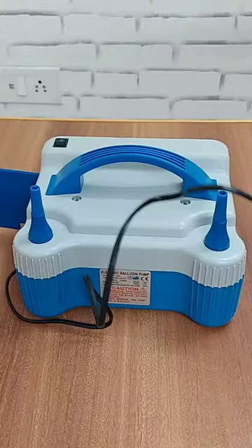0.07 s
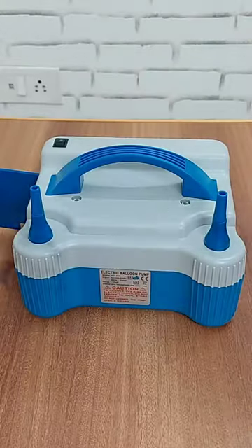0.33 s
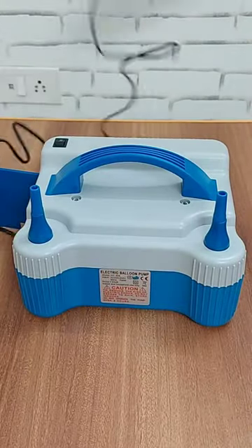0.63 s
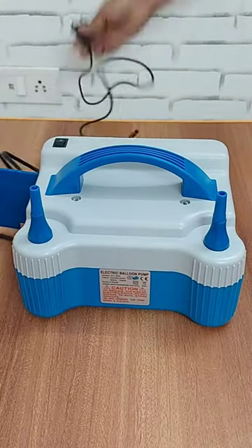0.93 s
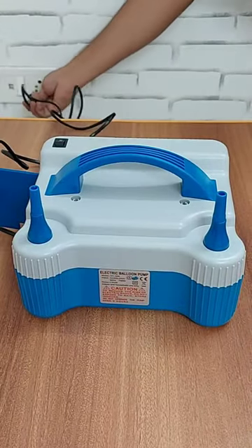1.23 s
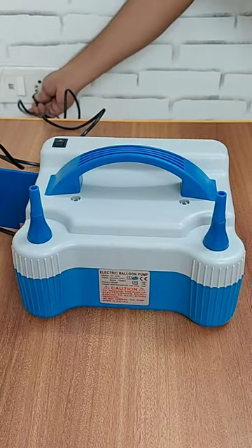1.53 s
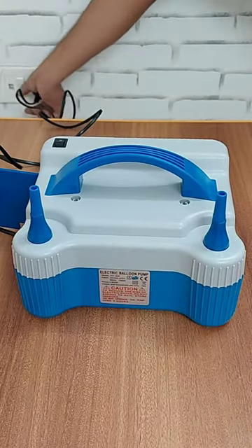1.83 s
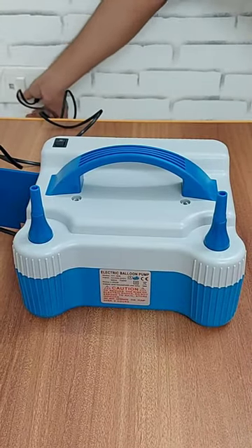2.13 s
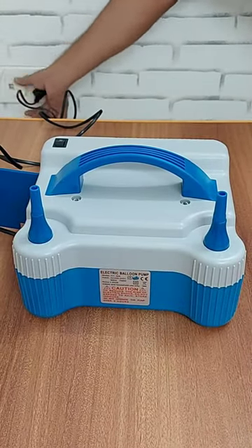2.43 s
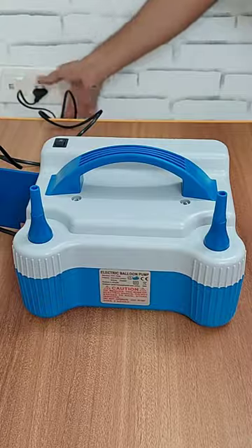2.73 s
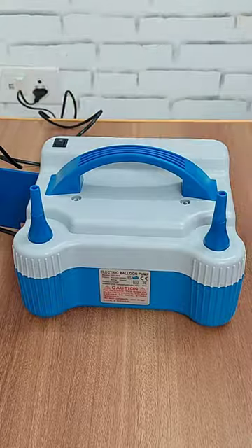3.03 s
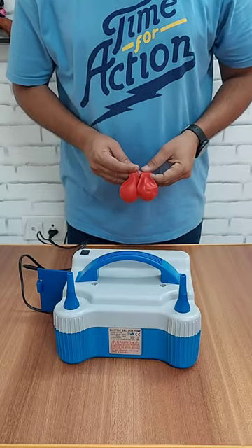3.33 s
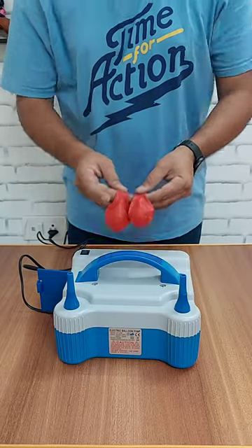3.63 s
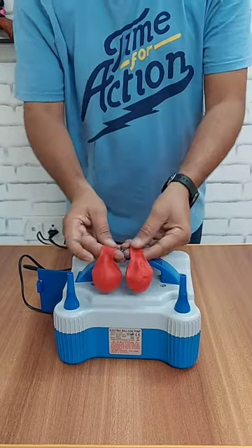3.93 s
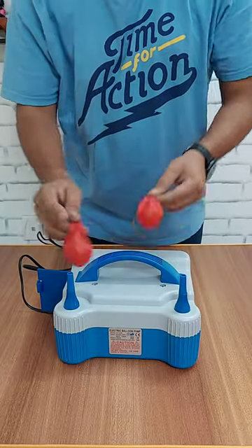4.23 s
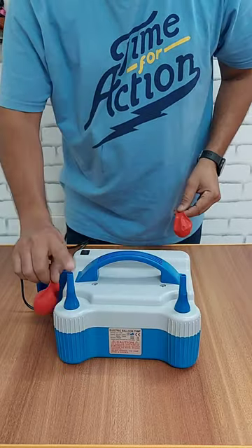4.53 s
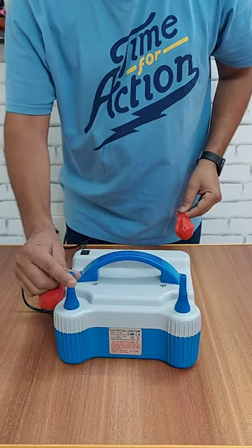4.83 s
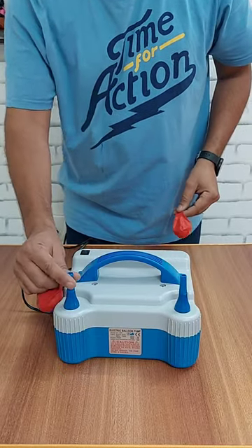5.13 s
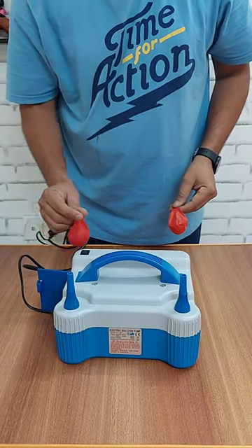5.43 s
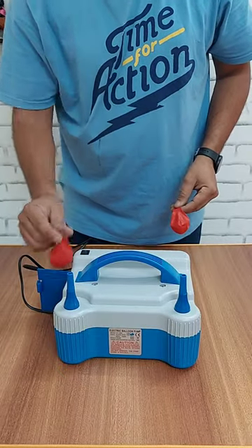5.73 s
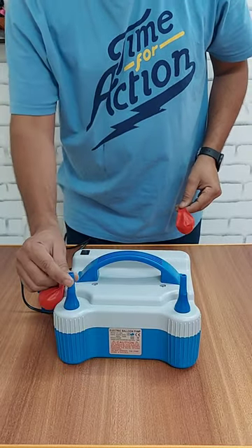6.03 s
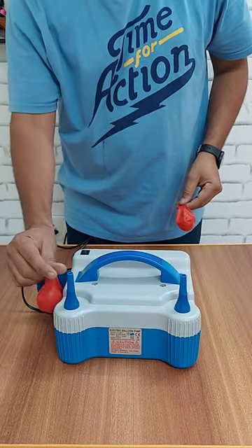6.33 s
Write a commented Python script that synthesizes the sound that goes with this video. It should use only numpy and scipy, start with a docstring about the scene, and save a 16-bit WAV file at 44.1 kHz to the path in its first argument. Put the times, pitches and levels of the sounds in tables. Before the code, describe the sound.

In a small, echoing room, a power cord slides and clatters on a wooden table over a low rumble. A plug and switch give a few plastic clacks, then sleeves and rubber rustle softly. An electric balloon pump kicks in twice, briefly and loudly, each time with a buzz, a rising whine and a roar of air that sinks as the fan coasts. The sound is in stereo and fairly near.

```python
"""A low rumble and the rustle of a cord come first, in a small, bright room. The cord of an electric
balloon pump is tossed over a wooden table, plugged in and switched on with clacks and thuds; rubber
and shirt sleeves rustle. The nozzle is pressed twice. Each time the motor jumps up with a mains buzz,
its seven-blade fan roars and whines, and then the drag of the air slows it down."""
import sys
import numpy as np
from scipy import signal
from scipy.fft import rfft, irfft, next_fast_len
from scipy.io import wavfile
from scipy.ndimage import uniform_filter1d

SR = 44100
rng = np.random.default_rng(int(sys.argv[2]) if len(sys.argv) > 2 else 0)


def unload_wav(signal):
    """Save mono or channel-first audio to the path in sys.argv[1] as 16-bit WAV at rate SR, clipped to [-1, 1]."""
    wavfile.write(
        sys.argv[1],
        SR,
        np.round(np.clip(np.atleast_2d(signal).T, -1, 1) * 32767).astype(np.int16),
    )


N = 289737
TIME = np.arange(N) / SR
FREE_TURNS_PER_S = 545  # the speed that the powered motor heads for


def undb(db):
    """Turn decibels into a number to multiply by."""
    return 10 ** (np.asarray(db) / 20)


def unit(x):
    """Scale a signal to an average (rms) level of 1."""
    return x / np.sqrt(np.mean(x ** 2))


def at_hz(points, hz):
    """Read between (pitch_hz, value) points, with every octave equally wide."""
    pitches, values = np.transpose(points)
    return np.interp(np.log(hz + 1), np.log(pitches), values)


def band(x, low_hz, high_hz, order=2):
    """Keep the sound between two pitches."""
    return signal.sosfilt(signal.butter(order, [low_hz, high_hz], "band", fs=SR, output="sos"), x)


def ring(x, modes):
    """Let a sound ring at an object's own pitches, its modes: pitch_hz, width_hz, level_db."""
    return sum(undb(db) * signal.lfilter(*signal.iirpeak(hz, hz / width, fs=SR), x)
               for hz, width, db in modes)


def wander(per_s):
    """A random drift of about 1 up or down."""
    points = rng.standard_normal(int(N / SR * per_s) + 2)
    return np.interp(TIME * per_s, np.arange(len(points)), points)


def bump(peak_s, half_s):
    """A smooth rise from 0 to 1 and back."""
    return np.exp(-((TIME - peak_s) / half_s) ** 2)


def lagged(x, lag_s):
    """Follow a changing value smoothly and a little late."""
    keep = np.exp(-1 / (lag_s * SR))
    return signal.lfilter([1 - keep], [1, -keep], x)


def diffuse(size, colour=None):
    """Noise from all sides: alike at both ears in the bass, unrelated in the treble."""
    # how alike the ears hear it: pitch_hz, likeness (1 = the same)
    likeness = [(60, .92), (130, 0.92), (290, 0.92), (640, 0.45), (1400, 0.018), (3000, -0.031),
                (7000, -0.062)]
    hz = np.arange(size // 2 + 1) * SR / size
    alike = at_hz(likeness, hz)
    white = rfft(rng.standard_normal((2, size)))
    mid, side = white[0] * np.sqrt(1 + alike), white[1] * np.sqrt(1 - alike)
    gain = 1 if colour is None else undb(at_hz(colour, hz))
    return unit(irfft(np.array([mid + side, mid - side]) * gain, size))


def noise(colour=None):
    """Noise from all sides, as long as the scene."""
    return diffuse(next_fast_len(N, True), colour)[:, :N]


def room(x, direct_db, build_s):
    """The direct sound, then dense echoes off table and brick that die faster in the treble."""
    # how long echoes take to fade by 60 dB: pitch_hz, fade_s
    echo_fades = [(100, 0.45), (600, 0.67), (2500, 0.4), (7000, 0.075), (15000, 0.16)]
    pitches, fades_s = np.transpose(echo_fades)
    size = SR // 2
    t, hz = np.arange(size) / SR, np.arange(size // 2 + 1) * SR / size
    spectrum, tail = rfft(diffuse(size)), 0
    for share, fade_s in zip(np.eye(len(pitches)), fades_s):
        weight = at_hz(np.c_[pitches, share], hz)
        tail += irfft(spectrum * weight, size) * undb(-60 * t / fade_s)
    tail = unit(tail * (1 - np.exp(-t / build_s))) / np.sqrt(size)
    tail[:, 0] += undb(direct_db)
    return signal.fftconvolve(x[None], tail, axes=1)[:, :N] / np.sqrt(1 + undb(2 * direct_db))


def background(rumble_db=-53, room_db=-51):
    """A restless rumble swells with each movement over soft room noise; both dip briefly once."""
    # the cord is dragged and the arms move: peak_s, half_length_s, level_db
    swells = [(0.036, 0.11, -40.5), (0.314, 0.085, -36.5), (0.61, 0.2, -46), (1.02, 0.066, -43),
              (1.33, .06, -52), (1.727, 0.028, -41.5), (1.915, 0.059, -46.5), (2.15, .08, -44.5),
              (2.33, 0.023, -45), (2.97, 0.19, -48.5), (3.768, 0.077, -53), (4.148, .25, -51.5),
              (4.72, 0.064, -43)]
    # tone of the rumble and of the room noise: pitch_hz, level_db
    rumble_colour = [(20, -8), (38, 0.5), (55, 5), (80, -1.5), (115, -5.5), (150, -5.5), (200, -20.5),
                     (300, -29.5), (600, -63.5)]
    room_colour = [(60, -23), (110, -2.5), (150, -6.5), (220, -7.5), (410, -15.5), (620, -18), (780, -23),
                   (1400, -22.5), (2050, -22), (2800, -33.5), (4100, -38), (6500, -45.5), (9000, -51),
                   (15000, -54)]
    movement = sum(undb(db) * bump(peak_s, half_s) for peak_s, half_s, db in swells)
    rumble = noise(rumble_colour) * (undb(rumble_db) + movement) * undb(3 * wander(14))
    flicker_db = 1.1 * wander(9)
    dip = undb(-12.5 * bump(peak_s=3.215, half_s=0.064))
    return (rumble + noise(room_colour) * undb(room_db + flicker_db)) * dip


def rubs(grain_db=3):
    """Cord and rubber slide in short, grainy strokes, each around its own pitch."""
    # sliding strokes: time_s, half_length_s, level_db, pitch_hz, width_hz
    strokes = [(0.056, 0.046, -58.5, 8750, 9200), (0.113, 0.026, -56.5, 3040, 3010),
               (0.419, 0.013, -39, 2320, 520), (0.456, 0.012, -43, 690, 300),
               (.77, 0.054, -59.5, 7800, 9350), (0.88, 0.053, -59, 1990, 600),
               (1.097, .3, -63.5, 4750, 5000), (1.316, 0.022, -49.5, 4100, 1500),
               (1.342, 0.022, -57, 3250, 600), (1.899, 0.069, -69, 4970, 7040),
               (2.93, .018, -58, 4280, 1100), (2.943, 0.016, -50.5, 3300, 600),
               (2.952, 0.055, -56.5, 4260, 3010), (3.083, 0.069, -65.5, 8950, 8170),
               (3.295, 0.063, -67, 6500, 1105), (3.817, 0.044, -55.5, 3430, 600),
               (4.57, 0.012, -63.5, 4850, 1290), (4.609, 0.035, -51.5, 3660, 1300),
               (4.675, 0.088, -55.5, 1100, 700), (4.983, .037, -61, 6600, 1800)]
    grain = undb(grain_db * wander(140))
    friction = rng.standard_normal(N) * grain
    out = 0
    for time_s, half_s, db, hz, width in strokes:
        mode = [(hz, width, 0)]
        out += unit(ring(ring(friction, mode), mode)) * undb(db) * bump(time_s - 0.005, half_s)
    return room(out, direct_db=-6.5, build_s=0.0023)


def knocks(tick_s=0.003, build_s=0.0058, spot_db=4):
    """Cord, plug, switch and nozzle knock: a short tick, then echoes that thud, ring, clack and snap."""
    # contacts: start_s, level_db, thud_db, body_db, snap_db, tick_db, body_hz, clack_hz
    # (thud, body and snap add to the level; the tick is set against its echoes)
    contacts = [(.301, -46, -1, -3, -18, -9, 656, 2110), (.399, -43, -1.5, 4, -8, -3, 680, 2360),
                (.424, -37, -19, 2, -12, -11, 655, 2380), (.494, -29.5, -8, 3.5, -5.5, -5, 695, 2950),
                (0.5189, -22.5, -11, -17, 4, -3.5, 755, 5000),
                (.553, -28.5, -4, -3.5, -30.5, -0.5, 870, 5200),
                (.682, -41.5, -11, 1, -10, -3.5, 626, 2690), (.956, -43, -7, -4.5, -21, -2, 700, 3650),
                (.981, -34, -10, -11, -2, -11, 705, 4880), (1.226, -42, 1, -9.5, -14, -4.5, 604, 3960),
                (1.516, -35, -4, -5, -7, -11.5, 660, 3200), (1.6529, -28, -3, -6, -5.5, -11, 860, 1850),
                (1.734, -46.5, 1, 1.5, -25, -2, 580, 1770), (2.459, -33, -15, -2.5, -8.5, -10, 514, 1880),
                (2.592, -34, -15, -7, -5.5, -5.5, 683, 2110), (4.735, -45, 0, 16.5, -26.5, -6, 574, 1930),
                (4.909, -68.5, 14.5, 21.5, -11, -1, 660, 1890), (5.007, -34.5, 0, 13.5, -15, -9, 500, 3080)]
    # ringing of plastic and table, and clacking of hard plastic: pitch_hz, width_hz, level_db
    body_modes = [(534, 48, 0), (650, 60, 4.5), (795, 220, -14.5), (970, 600, -4)]
    clack_modes = [(1272, 310, -21.5), (1720, 220, 6.5), (2140, 830, 9.5), (2740, 680, 2.5), (3357, 870, 3),
                   (4780, 1400, -10)]
    out, size = np.zeros((2, N)), SR // 3
    t = np.arange(size) / SR
    for start_s, level_db, thud_db, body_db, snap_db, tick_db, body_hz, clack_hz in contacts:
        # the spot that is struck adds two pitches of its own
        body = body_modes + [(body_hz, body_hz / 7, spot_db)]
        clack = clack_modes + [(clack_hz, clack_hz / 7, spot_db)]
        # thud, body, clack and snap: filter, part_db, fade_s
        parts = [(lambda x: band(x, 70, 300), thud_db - 1, 0.37),
                 (lambda x: band(ring(x, body), 330, 1500), body_db + 1, 0.23),
                 (lambda x: band(ring(x, clack), 1200, 7000), 1, 0.22),
                 (lambda x: band(x, 4600, 12800), snap_db + 1, 0.14)]
        start = int(start_s * SR)
        for shape, part_db, fade_s in parts:
            tick = 2 * undb(tick_db) * rng.standard_normal(size) * np.exp(-t / tick_s)
            echoes = diffuse(size) * (1 - np.exp(-t / build_s)) * undb(-60 * t / fade_s)
            gain = undb(level_db + part_db) / np.linalg.norm(shape(signal.unit_impulse(SR // 20)))
            out[:, start:start + size] += gain * shape(tick + echoes)
    return out


def sleeves(glide_s=(3.65, 3.85), glide_hz=(720, 1173), grain_db=1.5):
    """Cloth brushes on cloth as the arms reach out and part; a hollow note rises with the first swing."""
    # arm swings: fastest_s, rise_s, fall_s, swish_db, hiss_db
    swings = [(3.821, 0.15, 0.09, -42.5, -54.5), (4.17, 0.11, 0.065, -54, -53),
              (4.31, 0.093, 0.071, -76, -50)]
    # tone of the cloth's swish and hiss: pitch_hz, level_db
    swish_colour = [(290, -35), (500, -14), (528, -19.5), (752, -13), (1140, -8), (1250, -17), (1900, -12),
                    (2080, -9), (2770, -19), (3490, -10.5), (3860, -18), (7000, -37.5), (9100, -61.5),
                    (15400, -120)]
    hiss_colour = [(2000, -1.5), (3200, 3), (6500, -2.5), (9500, -10.5), (14000, -19.5), (16000, -24)]
    swish_level, hiss_level = 0, 0
    for fastest_s, rise_s, fall_s, swish_db, hiss_db in swings:
        swell = bump(fastest_s, np.where(TIME < fastest_s, rise_s, fall_s))
        swish_level += undb(swish_db) * swell
        hiss_level += undb(hiss_db) * swell
    glide = np.cos(2 * np.pi * np.cumsum(np.interp(TIME, glide_s, glide_hz)) / SR)
    hollow = unit(band(rng.standard_normal((2, N)), 1, 80) * glide)
    swish = (undb(-2) * noise(swish_colour) + undb(-6) * hollow) * swish_level
    hiss = noise(hiss_colour) * undb(-1) * hiss_level
    return (swish + hiss) * undb(grain_db * wander(90))


def motion(spin_up_s=0.104, drag_per_turn=0.00237):
    """Switched on, the motor draws less current as it gains speed; let go, air drag slows it."""
    # nozzle presses, which close the motor's switch: on_s, off_s, buzz_db
    presses = [(4.996, 5.249, -20.5), (6.142, 6.342, -30)]
    speed, current, inrush = np.zeros((3, N))
    for on_s, off_s, buzz_db in presses:
        on, off = int(on_s * SR), int(off_s * SR)
        current[on:off] = (1 - speed[on] / FREE_TURNS_PER_S) * np.exp(-TIME[:off - on] / spin_up_s)
        inrush[on:off] = undb(buzz_db) * current[on:off] ** 1.54  # the first gulp of current
        speed[on:off] = FREE_TURNS_PER_S * (1 - current[on:off])
        speed[off:] = speed[off - 1] / (1 + drag_per_turn * speed[off - 1] * TIME[:N - off])
    # round off the change from driving to coasting
    speed = uniform_filter1d(speed, size=SR // 20).clip(0) * (TIME > presses[0][0])
    return speed, current, inrush


def motor(turns, speed, current, ear_lag_rad=0.63, sway_db=4):
    """The rotor shakes the case once a turn, its twelve slots sing and seven fan blades whine."""
    # the case on the table booms as the speed passes these: pitch_hz, width_hz, level_db
    case_modes = [(251, 9.8, -8.5), (268.8, 6.5, -2), (290, 4.8, 0.5), (375, 6.7, -5), (408.7, 8.1, -7),
                  (474.7, 12, 2.5)]
    # how well the case lets out the blade whine: pitch_hz, level_db
    whine_colour = [(1650, -63), (1870, -46), (2200, -40.5), (2400, -36.5), (2900, -40), (3150, -38.5),
                    (3380, -28.5), (3550, -34)]
    angle = 2 * np.pi * turns
    # the hum flutters in its own way at each ear
    hum = np.array([np.sin(angle + lag + 0.5 * wander(45)) * undb(2.5 * wander(70))
                    for lag in (0, ear_lag_rad)])
    unbalance = np.sqrt(2) * hum * (speed / FREE_TURNS_PER_S) ** 2
    # the driving force presses the rotor harder into its bearings
    bearings = (undb(-40) + undb(-15) * current) * unbalance
    shake = (undb(-14) * ring(unbalance, case_modes) + bearings) * undb(sway_db * wander(60))
    # churning air at the blade tips roughens the whine
    blades = np.sqrt(2) * np.sin(7 * angle + 0.45 * wander(300))
    blades *= undb(at_hz(whine_colour, 7 * speed) + 3 * wander(200))
    # the slots ring the case, loudest while the motor draws current
    slots = np.sqrt(2) * np.sin(12 * angle + 0.9 * wander(700))
    slots = ring(slots, [(3290, 740, -7.5), (2800, 160, -7), (2480, 550, -8.5)])
    slots = band(slots, 2190, 3440, order=4) * (undb(-47) + undb(-11.5) * current ** 2)
    octave = undb(-43) * np.sin(2 * angle)
    whine = (blades + slots + octave) * (speed > 0)
    return shake + room(whine, direct_db=0, build_s=0.00041)


def buzz(inrush, current, mains_hz=50):
    """Magnetic pull peaks twice each mains cycle: it thumps the case and rattles the motor's brushes."""
    pull = np.maximum(np.cos(2 * np.pi * 2 * mains_hz * TIME), 0) ** 4
    thump = unit(band(ring(pull, [(112, 68, 0)]), 75, 450))
    # the case judders on the table
    judder = unit(band(ring(noise(), [(119, 30, 2.5), (153, 28, 0.5)]), 81, 180))
    brush_modes = [(527, 120, -12), (695, 170, -7), (1150, 300, 0), (3040, 74, 6)]
    rattle = unit(band(ring(noise() * pull, brush_modes), 300, 3600))
    # it growls under the strain while the rotor gathers speed
    growl = unit(band(noise(), 110, 380)) * lagged(current ** 2, lag_s=0.065)
    jolt = (undb(-4) * thump + undb(1) * judder + undb(-10) * rattle) * lagged(inrush, lag_s=0.0065)
    return jolt + undb(-27) * growl


def airflow(turns, speed, current, swirl=0.11, flutter_db=1.67):
    """Churning air roars in the fan chamber and hisses from the nozzle, pulsing a little each turn."""
    # tone of the fan's roar and the nozzle's jet: pitch_hz, level_db
    roar_colour = [(330, -24.5), (560, -5.5), (650, 6), (751, -2.5), (811, 1.5), (911, -2), (1000, 0.5),
                   (1110, -4.5), (1280, -3), (1450, -0.5), (1660, -19), (1770, -30), (2100, -39),
                   (2730, -48), (4620, -120)]
    jet_colour = [(90, -12), (200, 0), (330, 8), (450, 14.5), (600, -19), (1700, 4.5), (2300, 4.5),
                  (3000, 0), (3600, 0.5), (4500, -3.5), (6500, -7), (8500, -9), (10000, -7), (15500, -13)]
    # ringing of the air chamber: pitch_hz, width_hz, level_db
    chamber_modes = [(701, 300, -7), (896, 46, -8), (990, 38, 6.5), (1186, 27, 14)]
    # both grow with speed, and surge while the motor drives the fan hard
    flow = speed / FREE_TURNS_PER_S
    surge = lagged(current ** 2, lag_s=0.071) * flow
    roar = undb(-21) * noise(roar_colour)
    roar += undb(-22.5) * unit(band(ring(noise(), chamber_modes), 710, 1670))
    roar *= flow ** 1.41 * (1 + 5 * surge) * undb(flutter_db * wander(45))
    jet = noise(jet_colour) * flow ** 1.73 * (1 + 7 * surge) * undb(-25 + 0.5 * wander(70))
    return (roar + jet) * (1 + swirl * np.sin(2 * np.pi * turns))


def scene():
    """Handling noises, then the pump, over the background."""
    speed, current, inrush = motion()
    turns = np.cumsum(speed * (1 + 0.007 * wander(70))) / SR  # the rotor never runs quite evenly
    pump = motor(turns, speed, current) + buzz(inrush, current) + airflow(turns, speed, current)
    left_right = undb([[-0.15], [0.15]])
    return knocks() + rubs() + sleeves() + pump * left_right + background()


def record(dry):
    """Cut the highest treble, above 15550 Hz."""
    return signal.sosfilt(signal.ellip(10, 0.2, 70, 15550, fs=SR, output="sos"), dry)


dry = scene()
out = record(dry)
unload_wav(out)
```